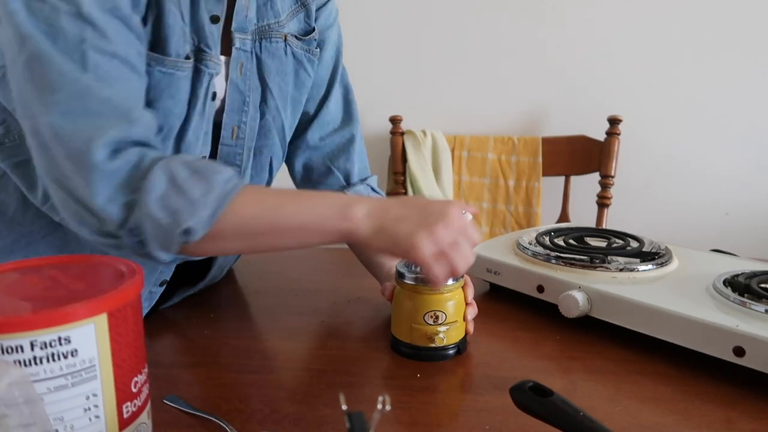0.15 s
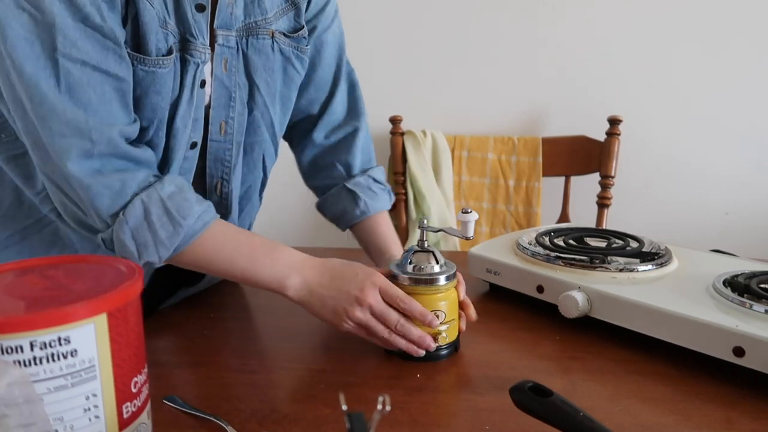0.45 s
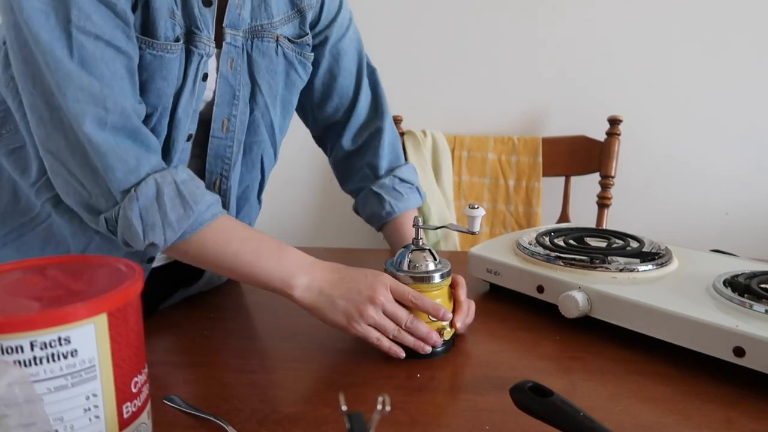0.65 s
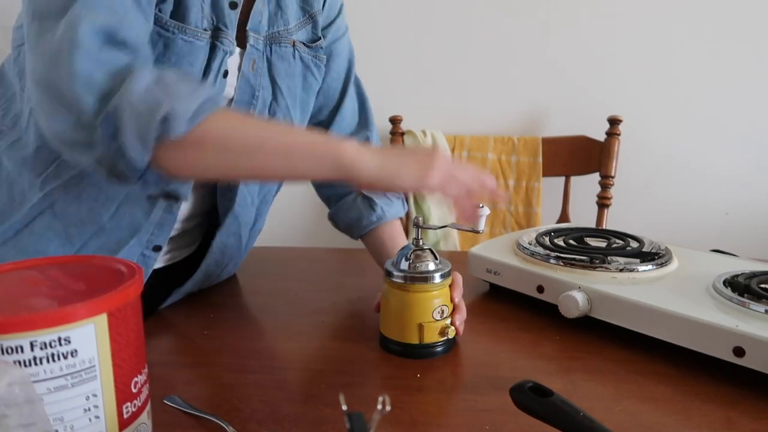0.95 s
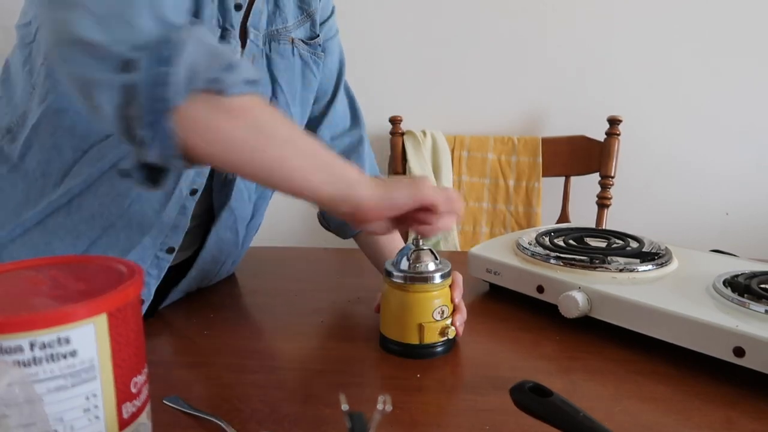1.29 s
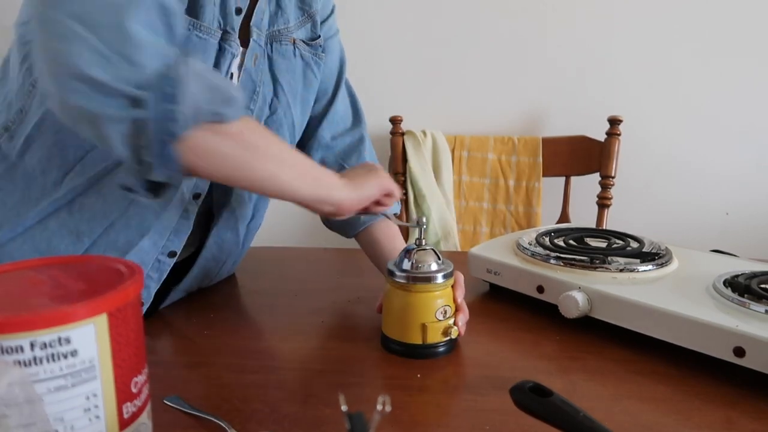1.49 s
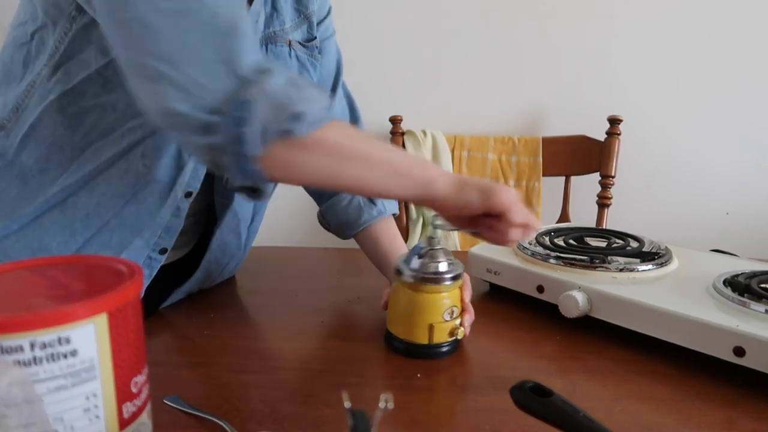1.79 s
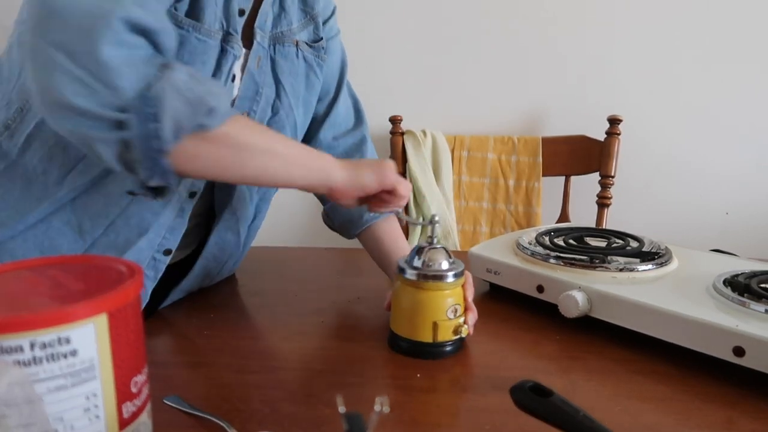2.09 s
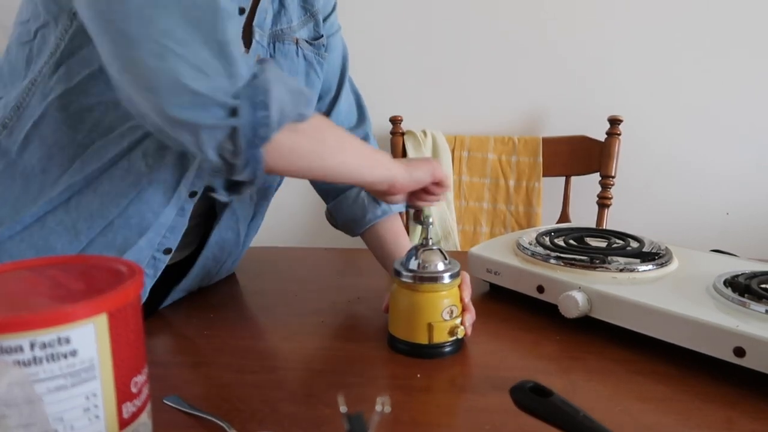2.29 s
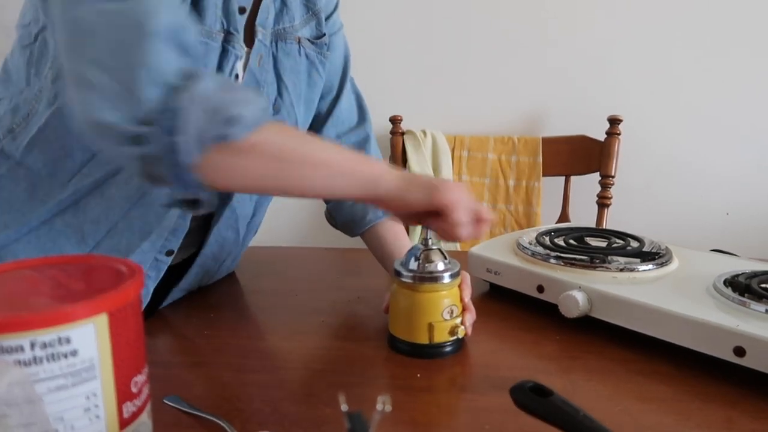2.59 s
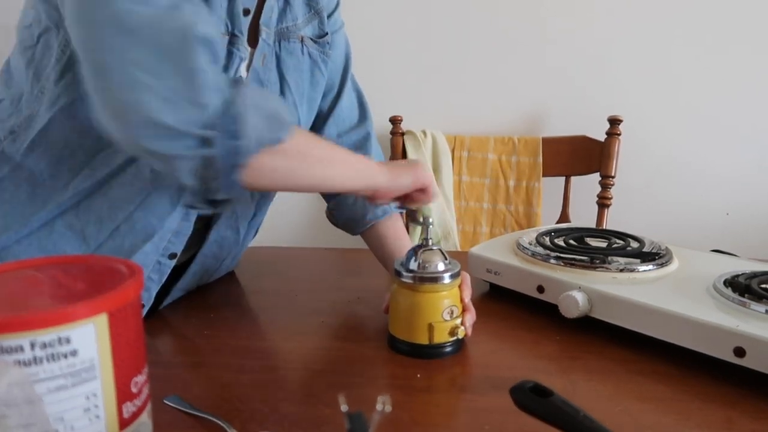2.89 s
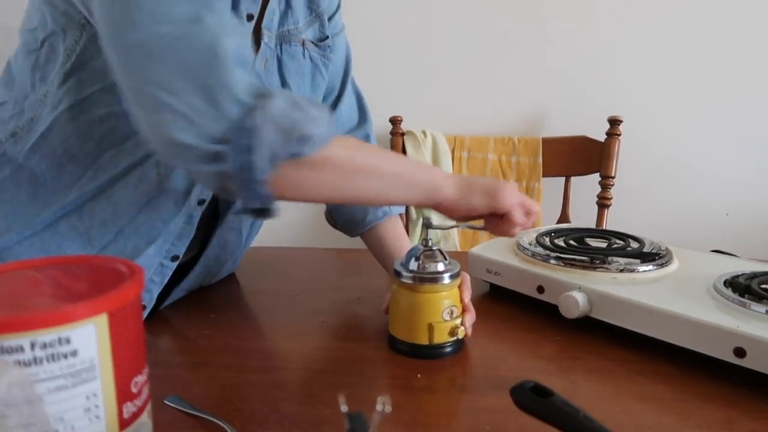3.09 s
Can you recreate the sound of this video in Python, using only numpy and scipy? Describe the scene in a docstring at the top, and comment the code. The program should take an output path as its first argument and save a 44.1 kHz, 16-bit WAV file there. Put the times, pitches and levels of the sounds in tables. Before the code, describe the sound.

A hand-cranked mill grinds peppercorns, dry cracks and grit ringing in its shell. Crunching dies away after 0.2 s; around 0.5 s a regrip jolts the mill, followed by near quiet with faint crank ticks and a clearer click at 1.2 s. From 1.3 s vigorous uneven crunching resumes to the end, with low wooden table knocks and rumble. Close stereo, short kitchen reverberation, soft hush.

```python
"""In a hard kitchen, a small hand mill on a wooden table grinds peppercorns. Corns crack as short ringing noise
bursts, grit crunches as random grains between them, and both excite the resonant shell of the mill. The loose crank
clicks; the jerking mill knocks and rumbles the table top, which rings in low modes. The hand pauses to regrip, with
a jolt of the mill. Decaying noise tails form the room and shaped noise the hush; two close ports differ mainly in
the treble."""
import sys
import numpy as np
from scipy import signal
from scipy.fft import rfft, irfft, next_fast_len
from scipy.io import wavfile
from scipy.ndimage import uniform_filter1d, map_coordinates

SR = 44100
rng = np.random.default_rng(int(sys.argv[2]) if len(sys.argv) > 2 else 0)


def put_to_file(sound):
    """Save the sound as 16-bit audio at rate SR, in the file named by the first command-line argument."""
    columns = np.atleast_2d(sound).T  # one column per channel
    safe = np.clip(columns, -1, 1)
    whole_steps = np.round(safe * 32767)
    wavfile.write(sys.argv[1], SR, whole_steps.astype(np.int16))


def volts_from_db(level):
    """Convert decibel levels to linear amplitude ratios."""
    exponent = np.asarray(level, float) / 20
    return 10 ** exponent


N = 143325  # samples


def unit(x):
    """Normalization: scales a signal to an rms of 1."""
    return x / np.sqrt(np.mean(np.abs(x) ** 2) + 1e-20)


def along(points, hz):
    """Logarithmic frequency scale: interpolates (f/Hz, value) points along it."""
    f, v = np.transpose(points)
    return np.interp(np.log(hz + 1), np.log(f + 1), v)


def wobble(rate):
    """Band-limited fluctuation: a smooth random curve with this many knots a second."""
    knots = rng.standard_normal(int(N * rate / SR) + 4)
    return map_coordinates(knots, [np.arange(N) * rate / SR])


def filtered(x, response):
    """Convolution theorem: multiplies the spectrum by a complex response of frequency."""
    n = x.shape[-1]
    m = next_fast_len(n + 8192)  # room for the ringing
    return irfft(rfft(x, m) * response(np.fft.rfftfreq(m, 1 / SR)), m)[..., :n]


def causal(gain):
    """Minimum phase: folds the cepstrum so that a gain responds only after its cause."""
    c = irfft(np.log(gain + 1e-6))
    half = len(c) // 2
    folded = np.r_[c[0], 2 * c[1:half], c[half], np.zeros(half - 1)]
    return np.exp(rfft(folded))


def ring(f, hz, width):
    """Damped resonance: a second-order band-pass with gain 1 at its centre."""
    return 1j * f * width / (hz * hz - f * f + 1j * f * width)


def modes(table, f):
    """Modal superposition: sums a body's resonances with alternating sign."""
    return sum((-1) ** k * volts_from_db(db) * ring(f, hz, w) for k, (hz, w, db) in enumerate(table))


def placed(times, sounds):
    """Linear superposition: starts each row of sounds at its time in seconds."""
    out = np.zeros(N + sounds.shape[1])
    for s, v in zip(times, sounds):
        out[round(s * SR):][:len(v)] += v
    return out[:N]


# Broad spectrum shared by cracks, clicks and grit, ending near 16 kHz: f/Hz, relative density/dB per Hz
SNAP_SPECTRUM = [(150, -27), (400, 4.5), (800, -2.5), (1460, -2), (2220, -9), (3870, -15.5), (6150, -23.5),
                 (9500, -41), (12000, -41.5), (15800, -44), (16500, -95)]


def snap(f):
    """Minimum phase: the broad spectrum of cracks, clicks and grit, released causally."""
    return causal(volts_from_db(along(SNAP_SPECTRUM, f)))


def cracks(table, thin_hz):
    """Transient excitation: a faint creak, an uneven ringing burst, then a crumbling tail."""
    lead_s, lead_db = 0.0022, -18  # the creak just before the break
    rise_s, ring_width, level_db = 0.00073, 0.32, -10.5  # ring width as a share of its pitch
    crumble_db, crumble_s = -15, 0.016
    s, db, hz, ms, snap_db = np.transpose(table)[..., None]
    t = np.arange(4096) / SR - 0.02  # the break is at 0
    burst_noise, uneven, piece_noise = rng.standard_normal((3, len(s), len(t)))
    # random level, smoothed over 36 samples
    splinters = volts_from_db(4.5 * 4.9 * uniform_filter1d(uneven, size=36, axis=1))

    after = np.maximum(t, 0)
    creak = volts_from_db(lead_db) * np.exp(t / lead_s)
    rise = 1 - np.exp(-after / rise_s)
    shape = np.exp(-after * 1000 / ms) * np.where(t < 0, creak, rise)

    def thin_snap(f):
        """First-order high-pass: the snap is thin below thin_hz."""
        return snap(f) * 1j * f / (thin_hz + 1j * f)

    def snap_and_ring(f):
        """Parallel paths: the broad snap beside a ring at the crack's own pitch."""
        pitch = ring(f, hz, ring_width * hz) ** 2 / (1 + 1j * f / 6000) ** 2
        return volts_from_db(snap_db) * thin_snap(f) + pitch

    burst = filtered(burst_noise * splinters * shape, snap_and_ring)
    # the loudest 2 ms rms sets the level
    loud = np.sqrt(uniform_filter1d(burst ** 2, size=88, axis=1).max(1, keepdims=True))
    pieces = unit(filtered(piece_noise * splinters, thin_snap))
    crumble = volts_from_db(crumble_db) * pieces * (t > 0) * np.exp(-after / crumble_s)
    return placed(s[:, 0] + t[0], (burst / loud + crumble) * volts_from_db(db + level_db))


# Corns cracking, and the mill jolting as the hand regrips near 0.5 s:
# t/s, relative level/dB, loudest ring f/Hz, burst decay time/ms, snap gain against ring/dB
CRACKS_AND_JOLTS = [(0.035, -14.5, 1780, 7.8, -14), (0.0435, -8.5, 1770, 3.3, -32),
                    (0.096, -14, 1680, 2.8, -34), (0.149, -13, 1420, 15, 5), (0.157, -1, 1720, 1.9, -7.5),
                    (0.488, -21.5, 1500, 2.9, -25), (0.503, -25.5, 1530, 6.7, 18),
                    (0.523, -4, 1520, 1.12, -15), (0.973, -27.5, 1030, 4.8, 20), (1.32, -4.5, 1760, 18, 9),
                    (1.379, -3, 1070, 3.5, -17), (1.386, 0, 1520, 5.3, -1), (1.455, -4.5, 1490, 7.1, 23),
                    (1.472, -8, 1520, 4.9, -7), (1.525, -8, 1460, 14, -5), (1.604, -12, 1360, 6.1, 19),
                    (1.658, -1, 1400, 20, 5), (1.728, -6, 1200, 14, 2), (1.779, -11.5, 1550, 1.8, -2),
                    (1.823, -6.5, 1300, 21, -16.5), (1.912, -4.5, 1260, 4.8, -7),
                    (1.949, -17.5, 1370, 22, -2), (1.967, -2.5, 1670, 6.3, 39), (1.991, -3, 1480, 5.4, -3),
                    (2.117, -15.5, 1430, 29, 4), (2.155, -11, 1670, 8.1, 7), (2.21, -6.5, 1260, 4.5, -11),
                    (2.255, -20, 1750, 3, -18), (2.268, -11.5, 1520, 5.1, -6), (2.311, -15, 1470, 4.9, 9),
                    (2.318, -11.5, 1660, 2.4, 5), (2.332, -6, 1570, 7.1, 4), (2.42, -13, 1360, 28, 2),
                    (2.5555, -14.5, 3020, 2, 16), (2.5885, -13, 2900, 1.8, 8.5),
                    (2.61, -5.5, 1180, 25, -8.5), (2.654, -14, 1940, 5.9, -20),
                    (2.707, -15.5, 1550, 12, -18), (2.78, -3, 1280, 6.3, -11), (2.844, -16, 1470, 16, -20),
                    (2.874, -3.5, 1470, 14.6, 5), (3.088, -2, 1480, 3.9, 2.5), (3.167, -12, 1460, 8.1, 8),
                    (3.22, -17, 1300, 5, 6)]


def peppercorns():
    """Impulsive excitation: cracking corns and the regrip jolt, each sound with its own pitch."""
    return cracks(CRACKS_AND_JOLTS, thin_hz=1010)


def grains(per_s, clump_db):
    """Shot noise: random short scrapes, a few much larger, in clumps of bounded size."""
    swell_db, size_db, grain_s = 4, 5, 0.0016
    hit = rng.random(N) < per_s / SR
    size = size_db * np.minimum(rng.exponential(size=N), 3)
    clumps = clump_db * np.tanh(wobble(60)) + swell_db * np.tanh(wobble(18))
    ticks = hit * volts_from_db(size + clumps)
    envelope = filtered(ticks, lambda f: 1 / (1 + 2j * np.pi * f * grain_s))
    return envelope * rng.standard_normal(N)


def grit():
    """Granular crushing: fragments of five sizes clump separately, each with a short ring."""
    sizes = []
    for hz, db in [(600, 2.5), (1250, 3), (2300, -1), (4000, -3.5), (7500, -2.5)]:
        scrapes = grains(500, clump_db=7.5)
        sizes.append(filtered(scrapes, lambda f: volts_from_db(db) * ring(f, hz, 0.9 * hz) ** 2))
    return unit(filtered(sum(sizes), snap))


# The loose crank clicking on its shaft:
# t/s, relative level/dB, loudest ring f/Hz, burst decay time/ms, snap gain against ring/dB
CRANK_CLICKS = [(0.701, -30.5, 2530, 11, 12), (0.775, -25, 2000, 5, -8), (0.809, -33, 2820, 3.8, -4),
                (0.827, -33.5, 2660, 10, 18), (0.907, -32, 3070, 6.9, 43), (1.149, -38, 2580, 11, 12),
                (1.209, -12, 2750, 10.3, 18)]


def crank():
    """Impact in a loose joint: clicks formed like cracks, with a thinner snap."""
    return cracks(CRANK_CLICKS, thin_hz=4640)


# Resonances of the mill: f/Hz, width/Hz, level/dB over the direct sound
SHELL_MODES = [(766, 22, -1.5), (919, 7.4, 8.5), (1030, 5.8, 5), (1338, 22, -3.5), (1465, 46, -11),
               (2756, 210, 9.5), (3247, 330, 2), (3849, 155, 12), (4590, 210, 2), (6050, 330, 8)]


def shell(f):
    """Forced vibration: the direct sound plus the modes it excites in the shell."""
    return 1 + modes(SHELL_MODES, f)


# Resonances of the table top: f/Hz, width/Hz, relative level/dB
TABLE_MODES = [(57, 8.4, 2), (140, 11.7, 11), (217.2, 15.7, 4.5), (276.2, 11.3, 9.5), (375, 15, 3),
               (426.6, 32, 0.5), (471, 42, -2), (553, 10, -1), (631, 18, 3.5), (705, 36, -4.5)]


def table_top(f):
    """Plate vibration: the low modes of the wooden top."""
    return modes(TABLE_MODES, f)


# The mill's foot knocking the table: t/s, relative peak level/dB, centre f/Hz
FOOT_KNOCKS = [(.038, -15.5, 550), (0.097, -15.5, 553), (0.493, -19, 560), (0.514, -22, 540),
               (0.532, -11.5, 574), (0.797, -26, 257), (0.974, -17, 377), (0.991, -21, 322),
               (1.209, -20.5, 284), (1.458, -11, 456), (1.681, -5, 220), (1.7, -7, 252), (1.73, -12.5, 593),
               (1.968, -7.5, 454), (2.125, -20, 183), (2.212, -15, 385), (2.231, -15, 350),
               (2.269, -17.5, 435), (2.334, -2, 294), (2.616, -16.5, 240), (2.661, -5.5, 493),
               (2.68, -10.5, 430), (2.877, -7.5, 636), (3.085, -15, 140)]


def knocks():
    """Impact excitation: a blunt push and a shudder set the table modes ringing."""
    push_s, shudder_s, shudder_db = 0.00028, 0.0074, -1.5
    blow_db, level_db, width = 3.5, -4.5, 0.73  # width as a share of the centre
    s, db, hz = np.transpose(FOOT_KNOCKS)[..., None]
    t = np.arange(SR // 4) / SR
    noise = rng.standard_normal((len(s), len(t)))
    shudder = volts_from_db(shudder_db) * noise * np.exp(-t / shudder_s)

    def struck(f):
        """Contact filtering: strongest around the centre and dull above 900 Hz."""
        around = ring(f, hz, width * hz) / (1 + 1j * f / 900) ** 2
        return (volts_from_db(blow_db) + table_top(f)) * around

    knock = filtered(np.exp(-t / push_s) + shudder, struck)
    peak = np.abs(knock).max(1, keepdims=True)
    return placed(s[:, 0], knock / peak * volts_from_db(db + level_db))


def wood(f):
    """Modal and broad response in parallel: the table modes over a dull thud."""
    return volts_from_db(-11.5) * ring(f, 220, 290) + table_top(f)


def rumble():
    """Structure-borne sound: grains of grinding felt through the table top."""
    return unit(filtered(grains(900, clump_db=3.75), wood))


# Course of the grinding: t/s, relative grit level/dB, relative table rumble level/dB
GRINDING = [(0, -29.5, -28), (.14, -32, -41), (.27, -36.5, -41.5), (.4, -54.5, -66), (.6, -41, -43),
            (.72, -47.5, -54), (0.849, -46, -45.5), (1.02, -46.5, -42.5), (1.12, -62, -61),
            (1.3, -40, -35.5), (1.5, -22.5, -31.5), (1.6, -25, -31), (1.85, -27, -27), (2.08, -29, -39.5),
            (2.2, -38.5, -37.5), (2.52, -31, -42), (2.7, -26.5, -41), (3.0, -28.5, -33), (3.25, -29, -37)]


def mill():
    """Source and body: cracks, clicks and grit drive the shell; rumble and knocks the table."""
    s, grit_db, rumble_db = np.transpose(GRINDING)
    time = np.arange(N) / SR
    crunch = grit() * volts_from_db(np.interp(time, s, grit_db) - 4)
    through_shell = filtered(peppercorns() + crank() + crunch, shell)
    through_table = rumble() * volts_from_db(np.interp(time, s, rumble_db) + 0.5)
    return through_shell + through_table + knocks()


def scattering(x):
    """Diffuse scattering: short decaying noise off the nearest surfaces."""
    t = np.arange(400) / SR
    scatter = rng.standard_normal(400) * np.exp(-t / 0.0016)
    return np.convolve(x, scatter / np.linalg.norm(scatter))[:N]


# Reverberation of the kitchen: f/Hz, t60/s
KITCHEN_DECAY = [(150, 0.45), (2000, 0.33), (12000, 0.35)]


def kitchen(x):
    """Diffuse reverberation: two unrelated noise tails, each frequency with its own decay."""
    out, step = np.zeros((2, N + SR)), SR // 4
    for a in range(0, N, step):  # tails are drawn anew every quarter second
        hz, t, z = signal.stft(rng.standard_normal((2, SR // 2)), SR, nperseg=256)
        decay = volts_from_db(-60 * t / along(KITCHEN_DECAY, hz)[:, None])
        tail = signal.istft(z * decay, SR, nperseg=256)[1]
        wet = signal.fftconvolve(x[None, a:a + step], tail / np.linalg.norm(tail[0]), axes=1)
        out[:, a + 130:][:, :wet.shape[1]] += wet  # the room answers 130 samples (3 ms) late
    return out[:, :N]


# Spectrum of the quiet house: f/Hz, relative density/dB per Hz
HUSH_SPECTRUM = [(20, 6.5), (120, 3), (344, -0.5), (863, -8), (11600, -33.5), (16000, -84)]


def house_hush():
    """Stationary noise: two unrelated channels with the spectrum of a quiet house."""
    noise = rng.standard_normal((2, N))
    hush = filtered(noise, lambda f: volts_from_db(along(HUSH_SPECTRUM, f)))
    return hush / np.std(hush[0]) * volts_from_db(-50)


# Difference between the two ports: f/Hz, side gain/dB
PORT_DIFFERENCE = [(60, -29), (200, -19), (1300, -13.5), (4400, 1), (9000, 8.5), (14000, 10)]


def ports(side):
    """Close spacing: the side signal is weak in the bass and strong in the treble."""
    return filtered(side, lambda f: volts_from_db(along(PORT_DIFFERENCE, f)))


def scene():
    """Sum and difference: mill, room and hush as mid and side, turned into two channels."""
    room_db, side_db = -7, -5
    dry = mill()
    near, far = kitchen(dry)
    hush = house_hush()
    mid = dry + volts_from_db(room_db) * near + hush[0]
    side = ports(0.33 * scattering(dry) + volts_from_db(room_db + side_db) * far + hush[1])
    return np.array([mid + side, mid - side])


def top_cut(x):
    """Nothing passes above the cut-off."""
    return signal.sosfilt(signal.butter(12, 16530, fs=SR, output="sos"), x)


def record(dry):
    """Two-channel pickup: the finished mix of both ports goes through the last processing stage."""
    return top_cut(dry)


dry = scene()
out = record(dry)
put_to_file(out)
```